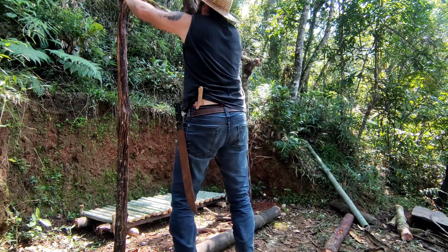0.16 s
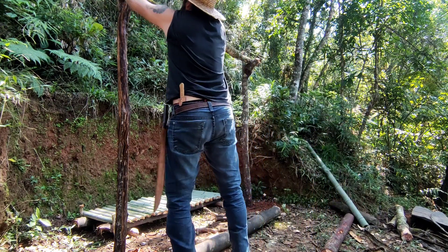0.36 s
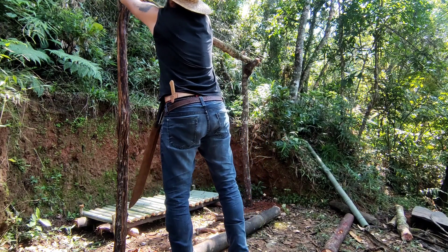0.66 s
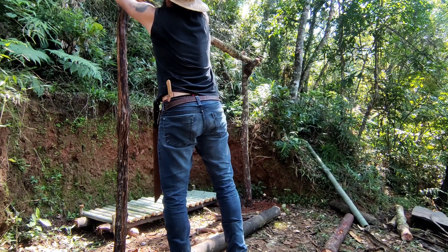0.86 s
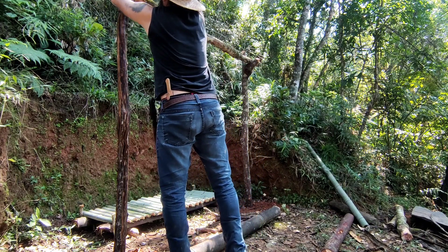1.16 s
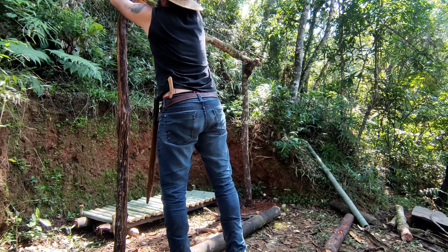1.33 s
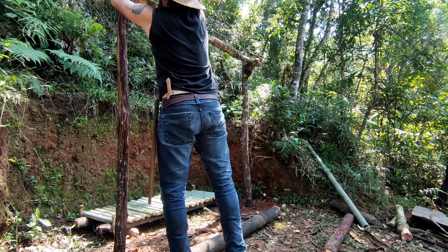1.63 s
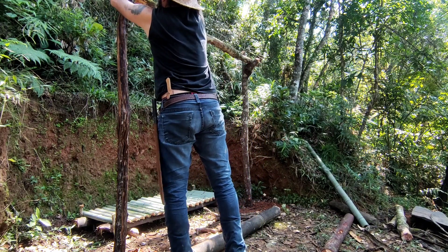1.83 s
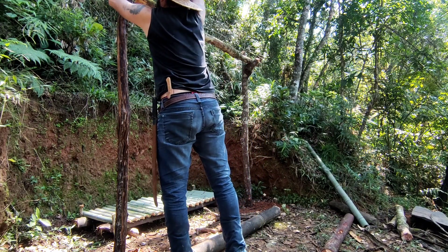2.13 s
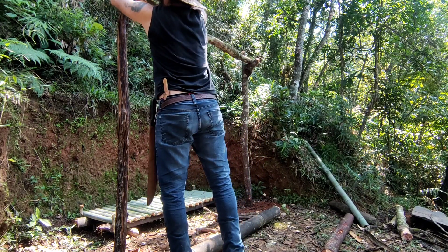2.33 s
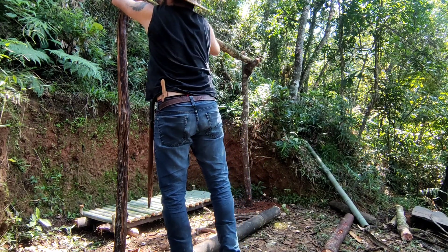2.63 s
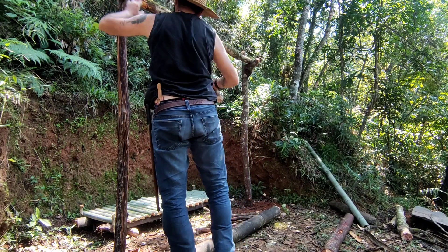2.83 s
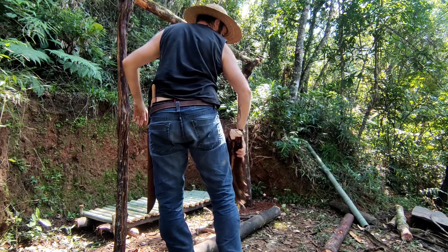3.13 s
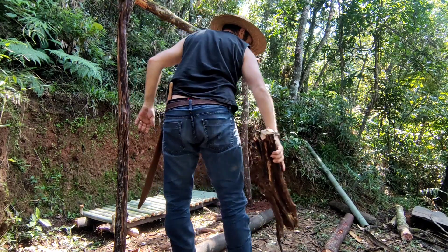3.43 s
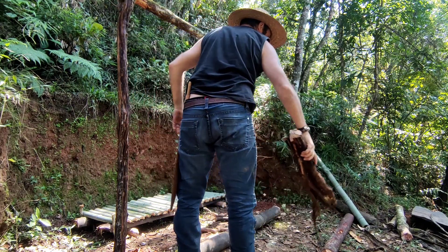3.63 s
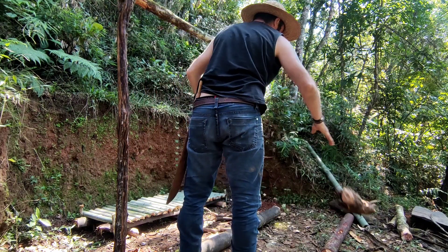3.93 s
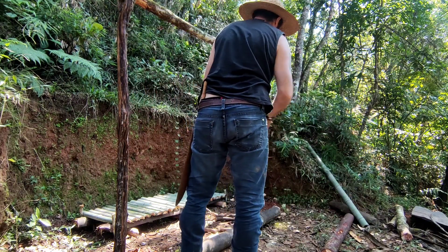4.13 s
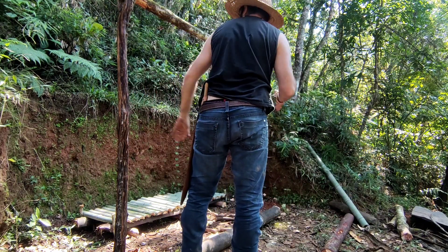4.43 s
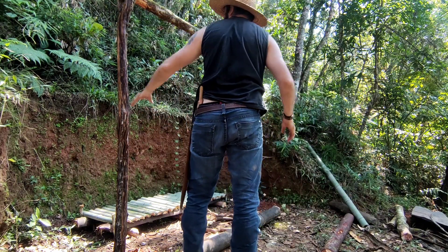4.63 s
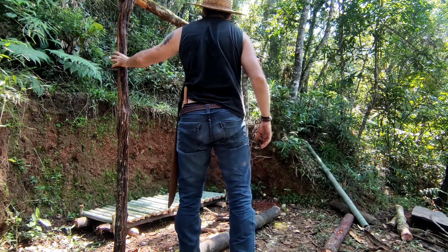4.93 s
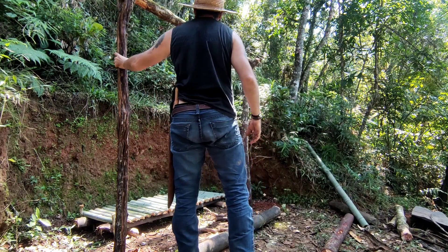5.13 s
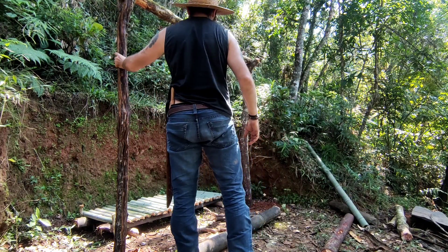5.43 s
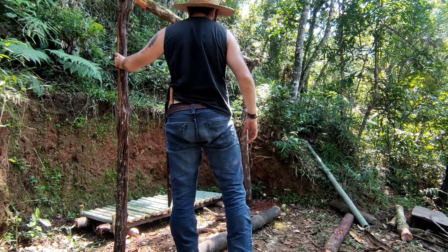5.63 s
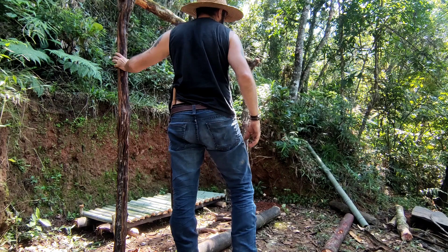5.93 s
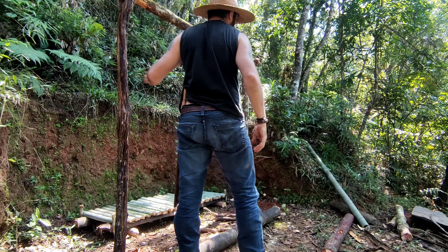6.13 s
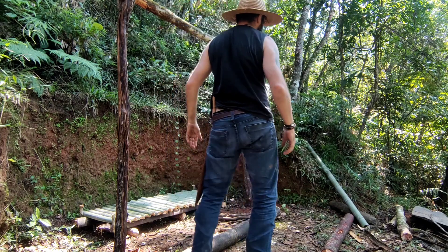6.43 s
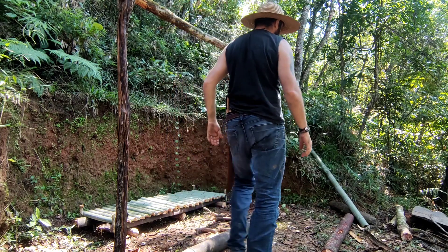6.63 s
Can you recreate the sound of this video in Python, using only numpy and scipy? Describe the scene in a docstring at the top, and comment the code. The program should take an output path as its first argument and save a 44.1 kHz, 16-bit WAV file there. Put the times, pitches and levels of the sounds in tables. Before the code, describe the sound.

Three sharp, ringing wooden knocks and a later dull thump on earth, with light bark crackles over a faint forest breeze.

```python
"""A forest clearing, on one microphone. A long green pole is knocked three times in the fork of a post,
ringing and rattling until a hand grips it, and a stick taps it. Bark and leaves scuff and crackle,
twigs tick, and a lump of roots is dropped on the soil and bounces. Trunks and an earth bank give
a short echo. Behind it all lie a far rumble, a breeze in the crowns and a soft leaf hiss."""
import sys
import numpy as np
from scipy import signal
from scipy.fft import rfft, irfft, next_fast_len
from scipy.io import wavfile
from scipy.ndimage import uniform_filter1d, map_coordinates

SR = 44100
rng = np.random.default_rng(int(sys.argv[2]) if len(sys.argv) > 2 else 0)


def wav_record(signal):
    """Record a signal, one row per channel, as 16-bit PCM in the file named by sys.argv[1]."""
    frames = np.transpose(np.atleast_2d(signal))
    bounded = np.clip(frames, -1, 1)
    # unit amplitude maps onto the largest positive 16-bit level
    quanta = np.round(bounded * 32767).astype(np.int16)
    wavfile.write(sys.argv[1], SR, quanta)


N = 298858


def pole_knocks():
    """Each square blow of the pole is followed by two glancing bounces in the fork."""
    # blows: start_s, level_db, hardness_hz, clatter_db, crack_db, bounce_db, grip_after_s
    blows = [(0.905, -17, 279, 28, -27.5, -50, 0.072), (1.579, -17.5, 1740, 23, -10, -18.5, .115),
             (2.2565, -17.5, 605, 32.5, -12, -20, 0.134)]
    flight_s, bounce_loss_db = 0.017, 10
    out = np.zeros(N)
    for start_s, level_db, hardness_hz, clatter_db, crack_db, bounce_db, grip_after_s in blows:
        add(out, start_s, pole_contact(level_db, grip_after_s, hardness_hz, clatter_db, crack_db))
        for k in range(2):
            late_s = (k + 1) * flight_s
            bounce = pole_contact(bounce_db - k * bounce_loss_db, grip_after_s - late_s,
                                  hardness_hz=1006, clatter_db=22, crack_db=-20, glance_hz=617)
            add(out, start_s + late_s, bounce)
    return out


def pole_contact(level_db, grip_after_s, hardness_hz, clatter_db, crack_db, glance_hz=65):
    """One contact rings the pole until a hand grips it, rattles it in the fork and cracks the bark."""
    # bending modes of the pole: pitch_hz, level_db, t60_s
    pole_modes = [(75, -10.5, 0.22), (116.3, -13, 0.24), (152.7, -10, 0.14), (224, -3.5, 0.097),
                  (264.8, -2.5, 0.31), (356, -0.5, 0.14), (488.6, -5.5, 0.15), (396.6, -1, 0.1),
                  (425, -7, 0.069), (460, -10, 0.19), (635, -2.5, 0.11), (664, -4.5, 0.045),
                  (1110, -16, 0.054), (762.5, -10, 0.13), (818, -3.5, 0.045), (850, 0, 0.04),
                  (889, 0.5, 0.085), (966, -4, 0.097), (1130, -19, 0.059), (1443, -23, 0.055),
                  (1490, -29.5, 0.054), (1767, -26, 0.072), (2000, -36, .09), (2400, -37, .09)]
    # rattle in the fork: frequency_hz, level_db, t60_s
    clatter_bands = [(60, -19, 0.072), (250, -10, 0.079), (420, 4, 0.088), (790, -8.5, 0.042),
                     (1330, 1.5, 0.039), (2980, -10, 0.13), (8000, -17.5, 0.12)]
    grip_t60_s, crack_t60_s = 0.076, 0.053
    t = np.arange(SR // 2) / SR
    grip = amp(-60 * np.maximum(t - grip_after_s, 0) / grip_t60_s)
    wood = ring(pole_modes, attack_s=0.001, scatter_db=1.0) * grip
    rattle = amp(clatter_db) * dying_noise(*np.transpose(clatter_bands))[:len(t)]
    crack = amp(crack_db - 60 * t / crack_t60_s) * rng.standard_normal(len(t))
    # a soft contact feeds few high modes, a glancing one few low modes
    feed = lambda hz: (1j * hz / (glance_hz + 1j * hz) / (1 + 1j * hz / hardness_hz)) ** 2
    return amp(level_db) * echo(filtered(wood + rattle, feed) + crack, wet_db=-13.5)


def stick_tap():
    """A stick taps the pole and rings briefly."""
    # taps: start_s, level_db
    taps = [(1.519, -30)]
    # modes of the stick: pitch_hz, level_db, t60_s
    stick_modes = [(732, -6, 0.096), (1194, -4.5, 0.077), (1330, 0, 0.059), (2220, -16.5, 0.049)]
    out = np.zeros(N)
    for start_s, level_db in taps:
        tap = ring(stick_modes, attack_s=0.001, scatter_db=1.5)
        add(out, start_s, amp(level_db) * echo(tap, wet_db=-10.5))
    return out


def root_lump():
    """A lump of roots pushes the soil once at each landing: a low thud."""
    # the drop and its bounce: start_s, level_db
    landings = [(4.1975, -11), (4.308, -36.5)]
    # modes of the soil: pitch_hz, level_db, t60_s
    soil_modes = [(90, 0.5, 0.075), (132.6, 2, 0.06), (174, -6, 0.079), (233, 0.5, 0.02)]
    out = np.zeros(N)
    for start_s, level_db in landings:
        thud = ring(soil_modes, attack_s=0.0013, scatter_db=0.47)
        add(out, start_s, amp(level_db) * echo(thud, wet_db=-12))
    return out


def twig_ticks():
    """Dry twigs and chips tick, each ringing a few short modes."""
    # ticks: start_s, level_db, pitch_hz, t60_s
    ticks = [(.012, -44, 623, 0.041), (.106, -31, 726, 0.017), (.744, -43.5, 846, 0.025),
             (1.758, -48.5, 960, 0.026), (1.906, -47, 737, 0.032), (3.074, -55, 1060, 0.025),
             (3.8, -51.5, 720, 0.028), (4.3002, -17, 1460, 0.0092), (6.564, -48, 840, 0.03)]
    # modes of a twig: pitch_ratio, level_db
    twig_modes = [(.33, 3), (.62, -3), (0.998, 0.5), (1.2, -5), (2.2, -13)]
    out = np.zeros(N)
    for start_s, level_db, pitch_hz, t60_s in ticks:
        modes = [(ratio * pitch_hz, mode_db, t60_s) for ratio, mode_db in twig_modes]
        tick = ring(modes, attack_s=0.00099, scatter_db=3.2)
        add(out, start_s, amp(level_db) * echo(tick, wet_db=-12.5))
    return out


def bark_tear():
    """Bark tears in an uneven, fading run of 18 slips, each ringing the fibres."""
    # tears: start_s, level_db, slips_per_s, t60_s
    tears = [(0.7227, -24, 390, 0.079)]
    # modes of the fibres: pitch_hz, level_db, t60_s
    fibre_modes = [(4200, -16, .004), (5100, -12, .004), (6200, 0, .005), (7000, -1, .005)]
    out = np.zeros(N)
    for start_s, level_db, slips_per_s, t60_s in tears:
        tear = np.zeros(SR // 2)
        gap_spread, sizes = rng.standard_normal((18, 2)).T
        gaps_s = np.exp(0.4 * gap_spread) / slips_per_s
        for slip_s, size in zip(np.cumsum(gaps_s) - gaps_s[0], sizes):
            slip = ring(fibre_modes, attack_s=0.0003, scatter_db=3)
            add(tear, slip_s, amp(2 * size - 60 * slip_s / t60_s) * slip)
        add(out, start_s, amp(level_db) * echo(tear, wet_db=-35))
    return out


def scuffs():
    """Bark and leaf litter crackle suddenly, or swell and fade as a hand or boot brushes over them."""
    # crackles: start_s, level_db, centre_hz, width_octaves, t60_s
    crackles = [(0.011, -46, 547, 0.68, 0.067), (0.103, -44.5, 5250, 0.42, 0.031),
                (0.682, -62, 6500, .44, .015), (0.724, -55, 5100, .15, .12), (0.723, -61, 3800, .5, .11),
                (.726, -40.5, 6560, 0.34, 0.07), (0.9053, -56, 1910, .8, .07),
                (0.739, -57, 3300, 0.12, 0.057), (1.454, -56, 5080, .35, .1),
                (1.513, -54, 2200, 1.15, 0.089), (1.709, -54, 2470, 2.8, 0.081),
                (1.781, -67, 5600, .2, .022), (2.388, -61, 4700, 0.29, .022),
                (2.401, -51.5, 3350, 1.8, .09), (3.005, -61, 4500, 1.3, 0.042),
                (3.191, -64.5, 3400, 1.1, 0.12), (4.199, -37, 800, 0.52, .07),
                (4.1978, -31, 6300, 1.14, 0.017), (4.2, -48, 3430, 1.1, 0.12),
                (4.299, -48, 5000, 0.62, 0.18), (4.301, -43, 1510, 0.61, 0.058),
                (4.521, -66.5, 4000, 1.1, 0.053), (4.962, -70, 6000, .6, 0.067)]
    # brushes: start_s, level_db, centre_hz, width_octaves, hold_s
    brushes = [(0.085, -55, 6070, 0.72, 0.0096), (0.092, -48, 660, 0.83, 0.0018),
               (0.548, -60.5, 1790, 1.34, .045), (1.2, -73.5, 6800, .2, .07), (3.08, -74.5, 6500, .3, .04),
               (4.318, -78, 1590, .22, 0.1), (6.077, -69.5, 6100, .4, .012),
               (6.191, -58.5, 6550, 1.8, 0.022), (6.458, -74.5, 6500, .48, .08)]
    out = np.zeros(N)
    for start_s, *band, t60_s in crackles:
        add(out, start_s, grain_burst(*band, rise_s=0.0013, hold_s=0.093 * t60_s, t60_s=t60_s))
    for start_s, *band, hold_s in brushes:
        add(out, start_s, grain_burst(*band, rise_s=0.017, hold_s=hold_s, t60_s=0.14))
    return out


def grain_burst(level_db, centre_hz, width_octaves, rise_s, hold_s, t60_s):
    """One scuff and its echo: a band of finely grained noise rises, holds and decays."""
    grain_db = 2.5
    t = np.arange(SR // 3) / SR
    bell = lambda hz: np.exp(-0.5 * (np.log2((hz + 1) / centre_hz) / width_octaves) ** 2)
    band = filtered(rng.standard_normal(len(t)), bell)
    grains = unit(band * amp(grain_db * wobble(1400, size=len(t))))
    envelope = np.minimum(t / rise_s, 1) * amp(-60 * np.maximum(t - rise_s - hold_s, 0) / t60_s)
    return amp(level_db) * echo(grains * envelope, wet_db=-17)


def echo(direct, wet_db):
    """The direct sound and, about 7 ms behind it, a scattered answer from the trunks and the bank."""
    # decay of the clearing: frequency_hz, t60_s
    trunk_decay = [(100, 0.24), (1000, 0.22), (7000, 0.46)]
    hz, t60_s = np.transpose(trunk_decay)
    tail = np.pad(dying_noise(hz, np.zeros_like(hz), t60_s), (300, 0))
    return np.pad(direct, (0, len(tail) - 1)) + amp(wet_db) * signal.fftconvolve(direct, tail)


def forest():
    """Far rumble, breeze in the crowns, a distant hush and leaf hiss, each wavering a little."""
    # course of the background: time_s, rumble_db, breeze_db
    air_levels = [(0.0, -52, -60), (0.73, -53, -61.5), (1.56, -49.5, -60.5), (1.73, -51, -53.5),
                  (2.13, -49.5, -58.5), (2.61, -52.5, -63.5), (3.04, -51, -60.5), (4.72, -49.5, -64),
                  (5.1, -51, -55), (5.51, -53.5, -63), (6.32, -55, -62), (6.78, -53, -66)]
    # spectra of the four layers: frequency_hz, density_db
    rumble_spectrum = [(20, -21), (35, -3), (60, 5), (110, 0), (160, -2.5), (230, -12), (400, -46.5)]
    breeze_spectrum = [(120, 1), (220, 0), (320, 6.5), (480, -3), (700, -14.5), (1000, -33.5)]
    leaf_spectrum = [(300, -38.5), (900, -2.5), (1300, -5), (2000, -1.5), (3000, -9), (5000, -10.5),
                     (8000, -10.5)]
    hush_spectrum = [(300, -21), (500, 2), (950, -5), (1060, -16), (2000, -26.5)]
    hush_db, leaf_db = -68.5, -68
    time_s, *levels = np.transpose(air_levels)
    rumble_db, breeze_db = [np.interp(np.arange(N) / SR, time_s, db) for db in levels]
    rumble = amp(rumble_db + 0.49 * wobble(5.7)) * rush(rumble_spectrum, patchy_db=0.16)
    breeze = amp(breeze_db + 0.86 * wobble(8.3)) * rush(breeze_spectrum, patchy_db=0.87)
    hush = amp(hush_db + 1.3 * wobble(2.99)) * rush(hush_spectrum, patchy_db=1.66)
    leaves = amp(leaf_db + 0.27 * wobble(12) + 0.65 * wobble(2.33)) * rush(leaf_spectrum, patchy_db=0.3)
    return rumble + breeze + hush + leaves


def ring(modes, attack_s, scatter_db):
    """Damped modes after a push, at slightly new strengths each time."""
    hz, db, t60_s = np.transpose(modes)[:, :, None]
    t = np.arange(SR // 2) / SR
    strength = amp(db + scatter_db * rng.standard_normal(hz.shape))
    partials = strength * amp(-60 * t / t60_s) * np.sin(2 * np.pi * hz * t)
    return -partials.sum(axis=0) * (1 - np.exp(-t / attack_s))


def dying_noise(at_hz, level_db, t60_s):
    """Noise in which each frequency has its own level and dies at its own speed; energy 1."""
    hz, t, cells = signal.stft(rng.standard_normal(SR // 2), SR, nperseg=256)
    fall_db = 60 * t / np.abs(along(hz, at_hz, t60_s))[:, None]
    gain = amp(along(hz, at_hz, level_db)[:, None] - fall_db)
    tail = signal.istft(cells * gain, SR, nperseg=256)[1]
    return tail / np.linalg.norm(tail)


def rush(spectrum, patchy_db):
    """Coloured noise of rms 1 with patches of random gain in time and frequency."""
    cells = signal.stft(rng.standard_normal(N), nperseg=512)[2]
    patches = uniform_filter1d(rng.standard_normal(cells.shape), 6, axis=0)
    patches = uniform_filter1d(patches, 12, axis=1)
    noise = signal.istft(cells * amp(patchy_db * unit(patches)), nperseg=512)[1][:N]
    return unit(filtered(noise, lambda hz: amp(along(hz, *np.transpose(spectrum)))))


def amp(db):
    """Gain of a level in dB."""
    return 10 ** (np.asarray(db) / 20)


def unit(x):
    """Scaled to rms 1."""
    return x / np.sqrt(np.mean(x ** 2) + 1e-20)


def along(hz, at_hz, values):
    """Values read on a log frequency axis."""
    return np.interp(np.log(hz + 1), np.log(np.add(at_hz, 1)), values)


def wobble(knots_per_s, size=N):
    """A smooth curve through random knots."""
    knots = rng.standard_normal(int(size * knots_per_s / SR) + 4)
    return map_coordinates(knots, [np.arange(size) * knots_per_s / SR])


def filtered(x, response):
    """The sound passed through a frequency response."""
    size = next_fast_len(len(x) + 8192)
    return irfft(rfft(x, size) * response(np.fft.rfftfreq(size, 1 / SR)), size)[:len(x)]


def add(track, start_s, sound):
    """Mixes a sound into the track at a time."""
    part = track[round(start_s * SR):][:len(sound)]
    part += sound[:len(part)]


def scene():
    """The clearing as it reaches the microphone, one channel."""
    return (forest() + pole_knocks() + stick_tap() + root_lump()
            + twig_ticks() + bark_tear() + scuffs())[None]


def record(dry):
    """The microphone's port lifts 6-7.5 kHz and little passes the converter's edge; bass cut, faint hiss."""
    # response of microphone and converter: frequency_hz, gain_db
    mic_response = [(20, 2.5), (3000, 0.5), (3700, -5), (5600, -5.5), (6100, 2.5), (7530, 3.5), (7580, -23),
                    (8600, -42.5), (16000, -49)]
    bass_hz, top_hz, hiss_db = 55, 15700, -99
    bass_cut = lambda hz: ((1j * hz) ** 2 / (bass_hz ** 2 - hz ** 2 + 1.3j * hz * bass_hz)) ** 2
    heard = filtered(dry[0], lambda hz: amp(along(hz, *np.transpose(mic_response))) * bass_cut(hz))
    hiss = amp(hiss_db) * rng.standard_normal(N)
    return filtered(heard + hiss, lambda hz: hz < top_hz)[None]


dry = scene()
out = record(dry)
wav_record(out)
```